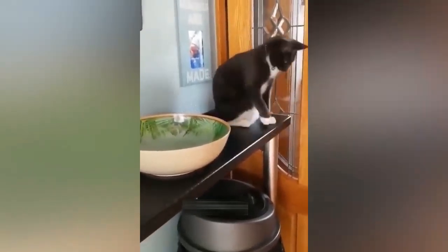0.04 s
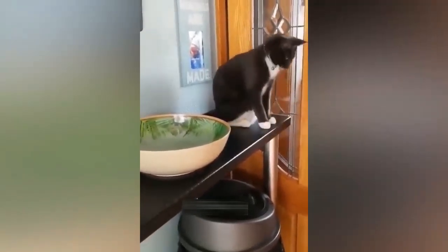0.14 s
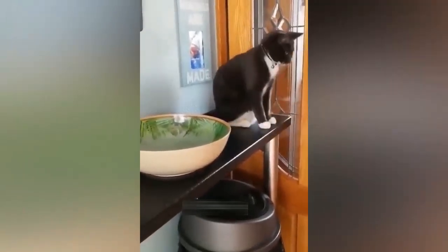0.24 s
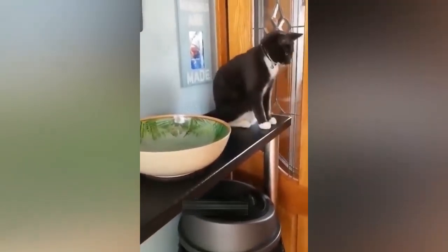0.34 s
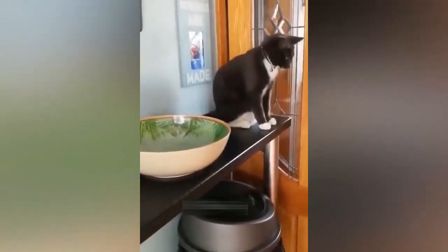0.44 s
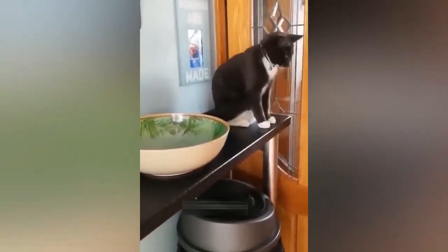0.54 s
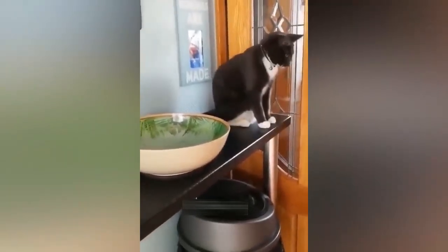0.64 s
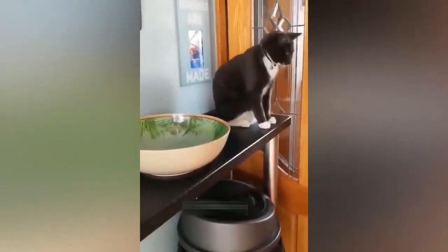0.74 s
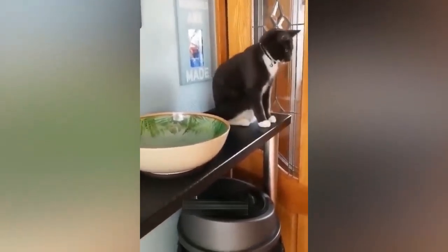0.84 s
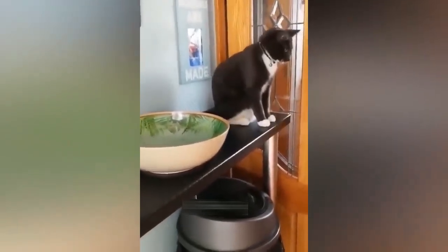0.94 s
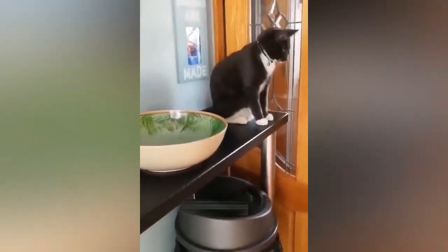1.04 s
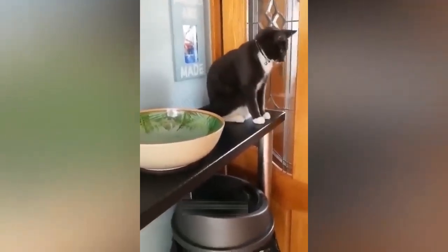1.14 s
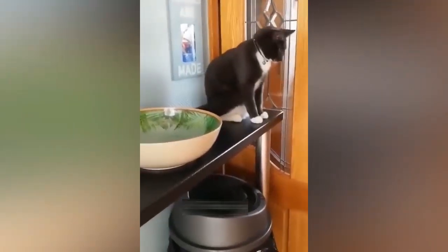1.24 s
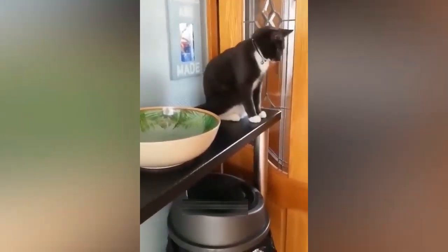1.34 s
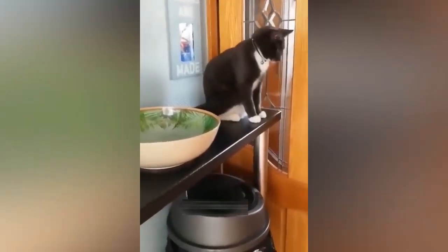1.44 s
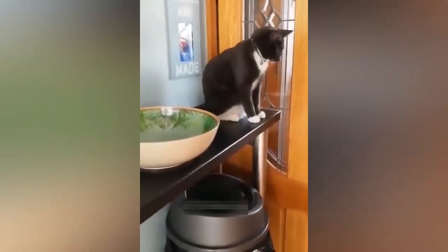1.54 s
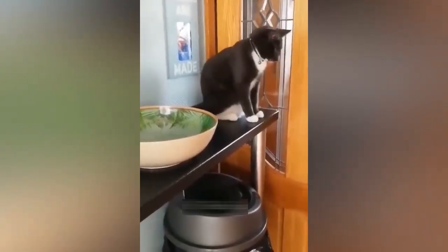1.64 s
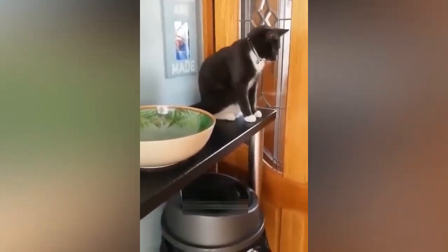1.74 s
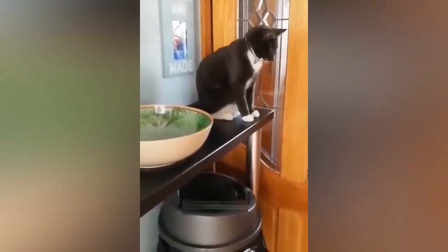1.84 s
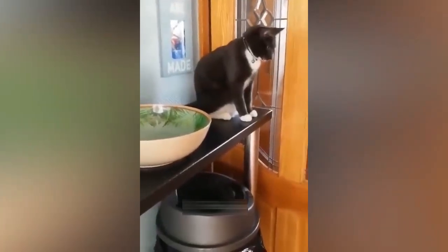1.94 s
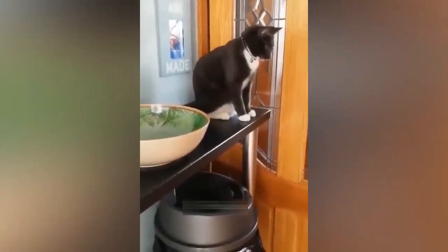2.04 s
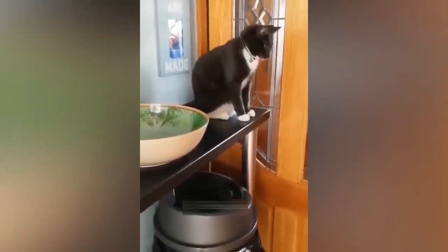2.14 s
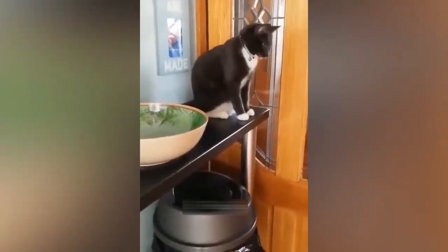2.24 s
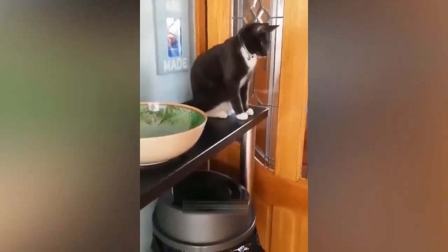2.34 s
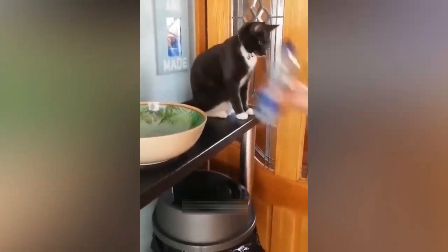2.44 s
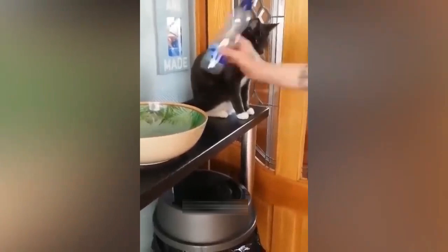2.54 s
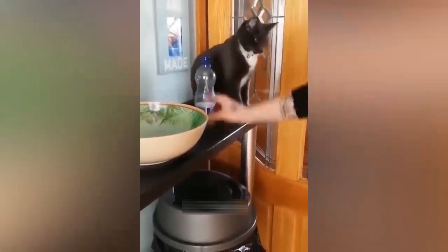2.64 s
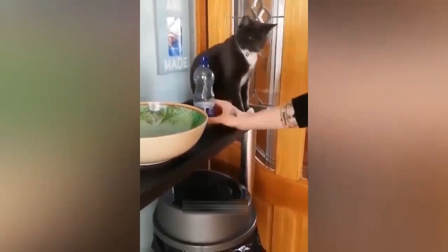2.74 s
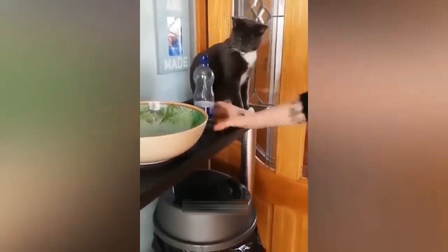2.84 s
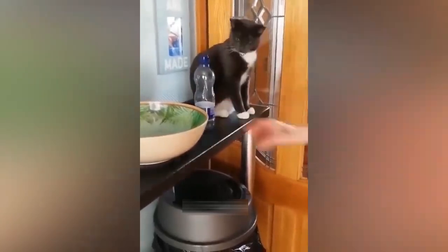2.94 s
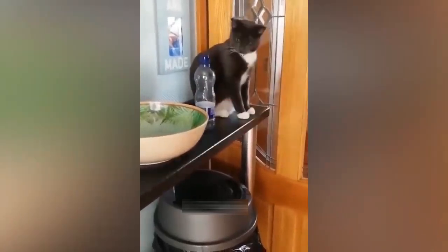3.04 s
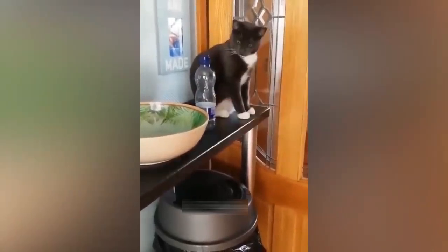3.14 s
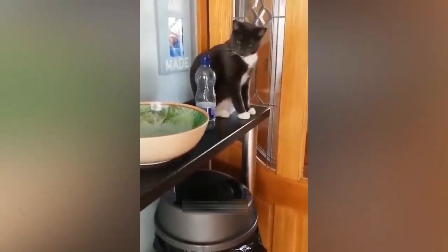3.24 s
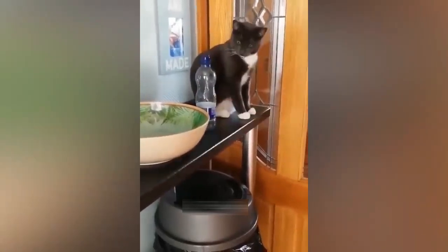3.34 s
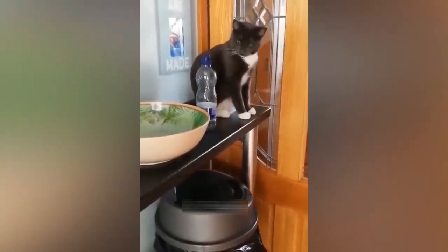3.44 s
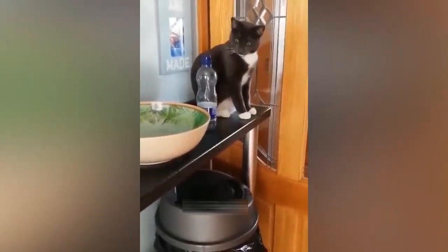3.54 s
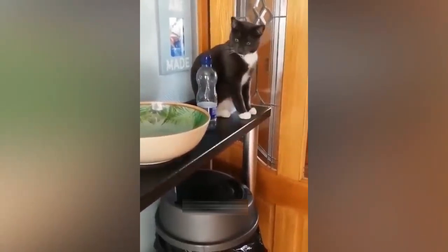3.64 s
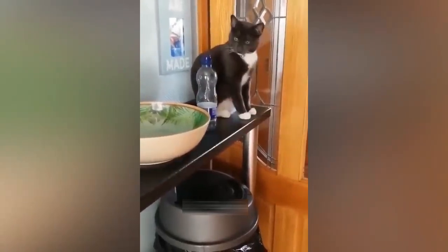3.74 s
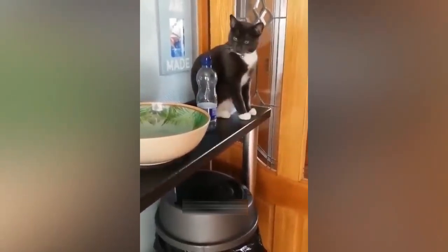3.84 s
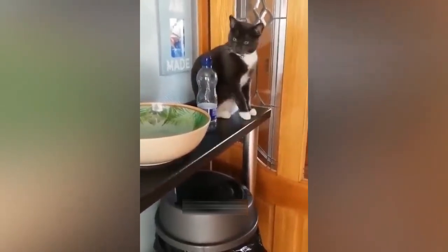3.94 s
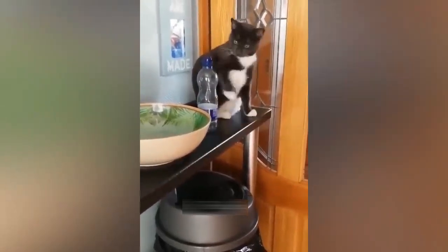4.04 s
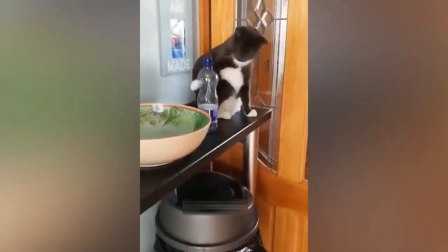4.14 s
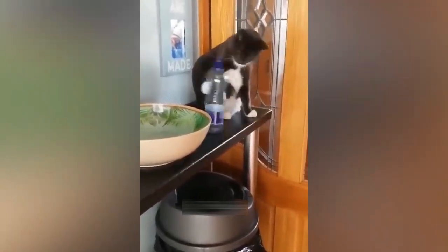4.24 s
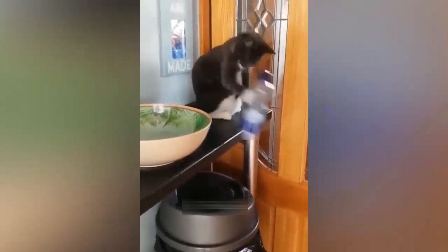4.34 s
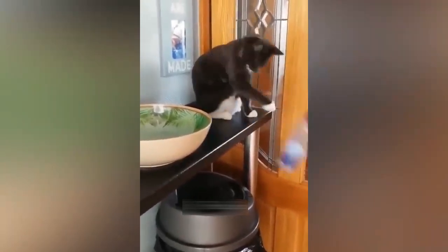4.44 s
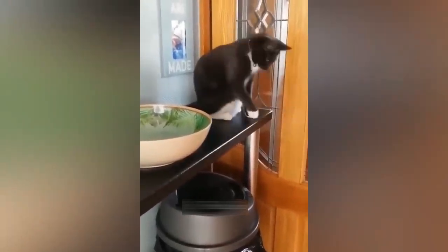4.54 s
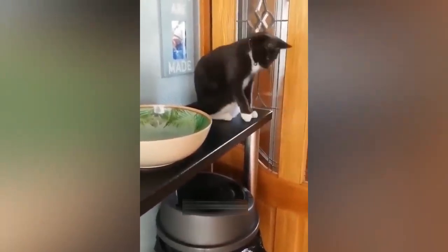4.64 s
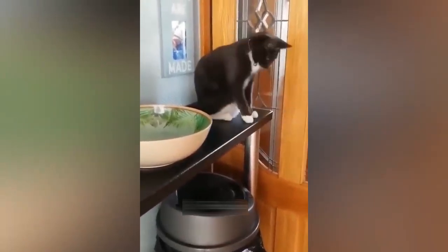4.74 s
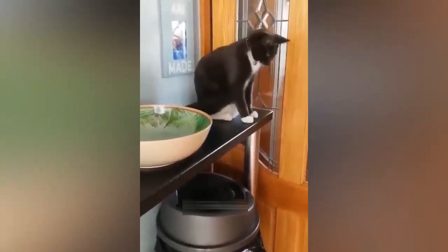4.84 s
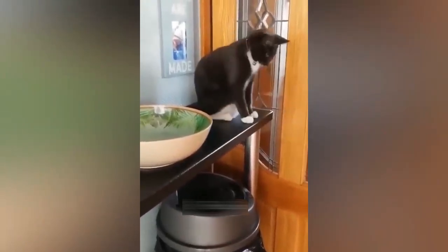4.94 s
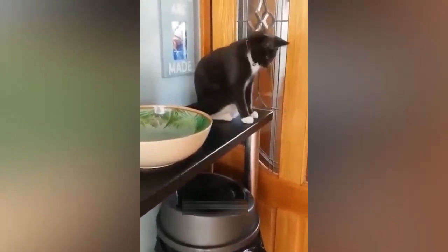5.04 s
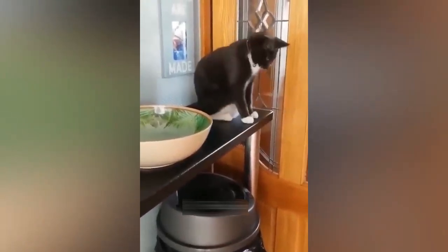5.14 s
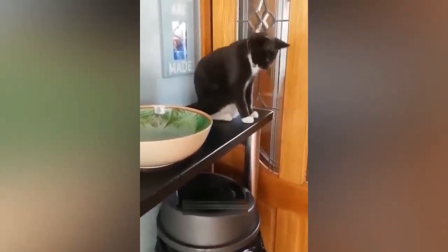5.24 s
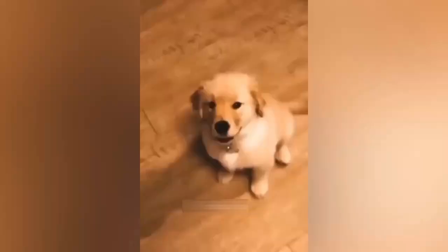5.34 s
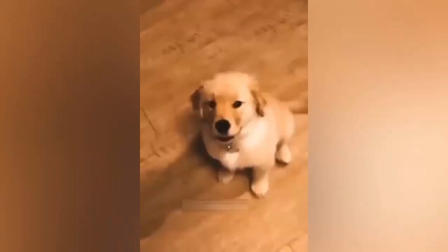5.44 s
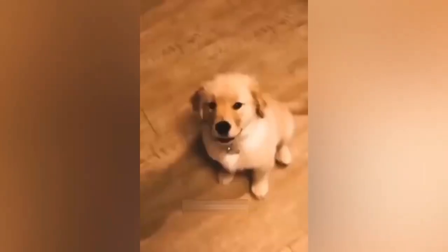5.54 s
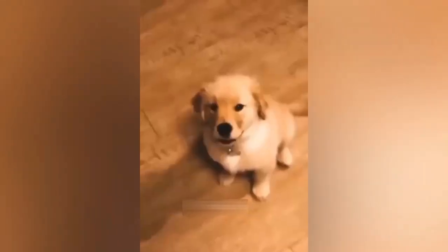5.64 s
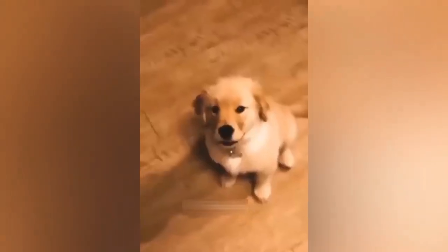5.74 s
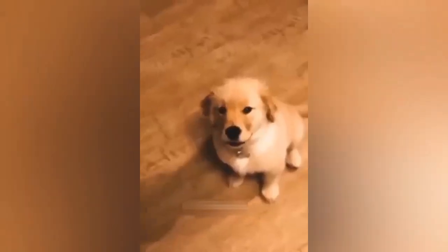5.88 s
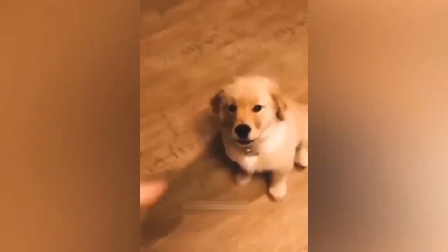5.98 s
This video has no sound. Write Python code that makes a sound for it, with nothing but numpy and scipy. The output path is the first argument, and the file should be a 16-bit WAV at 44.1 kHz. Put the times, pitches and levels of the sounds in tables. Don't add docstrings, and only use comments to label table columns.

```python
import sys
import numpy as np
from scipy import signal
from scipy.io import wavfile
from scipy.ndimage import uniform_filter1d

SR = 44100
rng = np.random.default_rng(int(sys.argv[2]) if len(sys.argv) > 2 else 0)


def dump(signal):
    limited = np.clip(np.atleast_2d(signal).T, -1, 1)
    pcm = np.round(limited * 32767).astype(np.int16)
    wavfile.write(sys.argv[1], SR, pcm)


def gain_from_db(level_db):
    decades = np.asarray(level_db, float) / 20
    return 10 ** decades


N = 265041
T = np.arange(N) / SR
CUT_S, RESUME_S = 5.499, 5.553
EDGES_HZ = 22 * 2 ** np.arange(0, 9.6, 1 / 3)
CENTRES_HZ = np.sqrt(EDGES_HZ[1:] * EDGES_HZ[:-1])
BANK = [signal.butter(2, EDGES_HZ[k:k + 2], "band", fs=SR, output="sos") for k in range(len(CENTRES_HZ))]

# start in seconds, level in dB, frequency in hertz, t60 in seconds,
# push (positive) or pull (negative) as a factor.
CASING_BUMPS = [
    (5.6, -22, 220, 0.016, 1),
    (5.7579, -8, 182, 0.029, -1.34),
    (5.93, -17.5, 6.9, 0.19, 1),
    (5.952, -18, 8.7, 0.24, 0.94),
]
# time in seconds, level in dB.
HAND_UNREST = [(0.0, -50.5), (0.4, -54.5), (0.5, -44.5), (0.8, -42), (1.12, -48.5), (1.3, -39.5),
               (1.64, -50), (2.33, -48.5), (2.7, -60.5), (3.08, -43), (3.8, -59.5), (4.33, -52.5),
               (4.46, -42.5), (4.7, -49), (5.0, -57.5), (5.5, -58)]


def edge_hit():
    # time in seconds, peak in dB, brightness in dB per octave, echo in dB.
    edge_blows = [
        (0.2108, -31, -6.5, -17),
        (0.2142, -6, -1, -8),
    ]
    # frequency in hertz, level per hertz in dB.
    edge_colour = [(71, -46), (120, -12), (586, -15.5), (662, -22), (812, -6.5), (975, -18), (1220, -19),
                   (1870, -7.5), (6460, -12.5), (10300, -9.5), (15500, -19)]
    # frequency in hertz, level in dB, t60 in seconds.
    edge_modes = [(204, 3.5, 0.067), (524, -7, 0.13), (615, -8, 0.29), (800, -9, 0.45), (1220, -5.5, 0.37),
                  (1870, -2, 0.18), (2170, -2, 0.14), (2670, -6, 0.2), (3690, 7.5, 0.052), (3980, 6, 0.041)]
    return knocks(edge_blows, edge_colour, edge_modes,
                  ring_db=-15.0, crack_db=-6.0, crack_tilt_db=0.1, crack_s=0.0033)


def first_bounces():
    # time in seconds, peak in dB, brightness in dB per octave, echo in dB.
    first_blows = [
        (0.528, -4.5, 0.3, -7.5),
        (0.767, -42, 0.3, -1.5),
    ]
    # frequency in hertz, level per hertz in dB.
    first_colour = [(240, -55), (400, -25.5), (1080, -13), (1190, -18), (1540, -10), (1690, -9),
                    (4160, -22.5), (4840, -24), (5390, -20), (11400, -24), (15500, -29)]
    # frequency in hertz, level in dB, t60 in seconds.
    first_modes = [(717, -3, 0.38), (780, -11, 0.4), (1192, 5.5, 0.34), (1376, 4, 0.29), (1634, 3, 0.2),
                   (1725, 1, 0.3), (2004, 5.5, 0.11), (2150, -4, 0.21), (2250, -14, 0.22),
                   (2540, -7, 0.081), (2940, 0.5, 0.11), (3100, 0, 0.17), (3370, -4.5, 0.14),
                   (4020, -14, 0.15)]
    return knocks(first_blows, first_colour, first_modes,
                  ring_db=-17.5, crack_db=-12.0, crack_tilt_db=10.0, crack_s=0.0032)


def set_down():
    # time in seconds, peak in dB, brightness in dB per octave, echo in dB.
    set_blows = [
        (2.804, -1.6, 0.25, -13.5),
        (2.839, -16.5, -1, -13),
    ]
    # frequency in hertz, level per hertz in dB.
    set_colour = [(71, -52), (120, -25), (353, 1), (407, -13.5), (509, -6.5), (552, -9.5), (5380, -15),
                  (6870, -21), (10300, -19), (14000, -31), (15500, -84)]
    # frequency in hertz, level in dB, t60 in seconds.
    set_modes = [(144, -16, 0.099), (274, -1, 0.16), (330, -10, 0.32), (513, 0.5, 0.28), (598, -3, 0.3),
                 (982, -10, 0.25), (1086, -9, .25), (1320, -1, 0.16), (1590, -9, 0.2), (1740, -7, .22),
                 (1776, -2.5, 0.24), (1920, 7.5, 0.07), (2180, -15, .2), (2471, -5, 0.16)]
    return knocks(set_blows, set_colour, set_modes,
                  ring_db=-19.5, crack_db=0.0, crack_tilt_db=-2.5, crack_s=0.0031)


def let_go():
    # time in seconds, peak in dB, brightness in dB per octave, echo in dB.
    release_blows = [
        (2.953, -8.5, -0.1, -12),
        (2.9595, -8, 8, -27),
    ]
    # frequency in hertz, level per hertz in dB.
    release_colour = [(500, -54), (1200, -16), (3300, -12), (4300, -12), (5200, -5.5), (7000, -1.5),
                      (9300, -4), (12500, -1), (16000, -1)]
    # frequency in hertz, level in dB, t60 in seconds.
    release_modes = [(4300, -12, 0.13), (9254, -2, 0.13), (10200, -4, .18), (11600, -8, .2),
                     (12260, 4, .15), (13200, 0, .08), (14140, 0, .14), (15600, -10, .2)]
    return knocks(release_blows, release_colour, release_modes,
                  ring_db=-22.0, crack_db=-3.5, crack_tilt_db=-4.0, crack_s=0.0023)


def second_bounce():
    # time in seconds, peak in dB, brightness in dB per octave, echo in dB.
    second_blows = [
        (4.869, -2, 0.32, -7.5),
    ]
    # frequency in hertz, level per hertz in dB.
    second_colour = [(180, -59), (300, -25.5), (600, -18.5), (674, -12.5), (1020, -13.5), (1780, -7),
                     (2170, -9.5), (8420, -16.5), (9450, -37), (10100, -19), (15500, -20)]
    # frequency in hertz, level in dB, t60 in seconds.
    second_modes = [(686, -1, 0.5), (871, -1.5, 0.6), (1298, 5, .12), (1365, -1, 0.47), (1545, -5, 0.18),
                    (1770, 8.5, 0.21), (1990, 5, 0.097), (2300, -18, 0.2), (2440, -4, 0.1),
                    (2590, -12, 0.3), (2955, -2, 0.46), (3050, -2, 0.31)]
    return knocks(second_blows, second_colour, second_modes,
                  ring_db=-20.0, crack_db=-1.0, crack_tilt_db=-2.5, crack_s=0.0019)


def side_bounce():
    # time in seconds, peak in dB, brightness in dB per octave, echo in dB.
    side_blows = [
        (5.032, -6.5, 0.3, -14),
    ]
    # frequency in hertz, level per hertz in dB.
    side_colour = [(180, -53), (300, -24), (553, -11), (863, 0.5), (1020, -13), (1420, -4), (1540, -8.5),
                   (4960, -21.5), (10400, -18), (15500, -23)]
    # frequency in hertz, level in dB, t60 in seconds.
    side_modes = [(683, -1.5, 0.5), (750, -10.5, 0.6), (877, 0.5, 0.58), (1220, -14, 0.28),
                  (1430, 1.5, 0.35), (1560, -1, 0.089), (1628, -10, 0.37), (1760, -6, 0.38),
                  (1920, -4, 0.16), (1980, -5, 0.23)]
    return knocks(side_blows, side_colour, side_modes,
                  ring_db=-17.5, crack_db=-4.0, crack_tilt_db=0.5, crack_s=0.0013)


def last_bounces():
    # time in seconds, peak in dB, brightness in dB per octave, echo in dB.
    last_blows = [
        (5.272, -13.5, 0.3, -11),
        (5.384, -41, 0.3, -23),
    ]
    # frequency in hertz, level per hertz in dB.
    last_colour = [(180, -62), (300, -68), (685, 1.5), (953, -16), (1750, -9.5), (5390, -9.5), (8140, -30),
                   (10600, -18), (13800, -25), (15500, -53)]
    # frequency in hertz, level in dB, t60 in seconds.
    last_modes = [(694, 2.5, 0.39), (790, 1.5, 0.28), (1200, -1, 0.22), (1550, -4, .25), (1810, 6, 0.21),
                  (1949, 3, 0.22), (2191, -4, .25), (2730, -12, 0.25), (2960, 2, 0.21), (3289, 2, 0.13)]
    return knocks(last_blows, last_colour, last_modes,
                  ring_db=-20.5, crack_db=-5.0, crack_tilt_db=6.0, crack_s=0.0038)


def light_touches():
    # time in seconds, peak in dB, brightness in dB per octave, echo in dB.
    snap_blows = [
        (5.206, -20, -2.4, -9.5),
    ]
    brush_blows = [
        (0.884, -30, -1, -12),
        (0.889, -26, 1, -7),
    ]
    tick_blows = [
        (0.66, -27.5, 1, -4.5),
        (4.288, -42, -6, -14),
        (4.487, -29.5, -7.5, -2),
    ]
    # frequency in hertz, level per hertz in dB.
    snap_colour = [(500, -43), (1200, -12), (3000, -11.5), (4300, -9), (6000, -2), (10000, 0),
                   (14000, -1.5), (16000, -9)]
    # frequency in hertz, level in dB, t60 in seconds.
    brush_modes = [(6900, -4, .1), (10060, 7.5, 0.088)]
    out = knocks(snap_blows, snap_colour, [], ring_db=-20, crack_db=-2.5, crack_tilt_db=-1.0, crack_s=0.0025)
    out += knocks(brush_blows, snap_colour, brush_modes,
                  ring_db=-10.5, crack_db=-7.5, crack_tilt_db=-5.5, crack_s=0.0056)
    out += knocks(tick_blows, snap_colour, [], ring_db=-20, crack_db=-2.5, crack_tilt_db=-1.5, crack_s=0.012)
    return out


def knocks(hits, colour, modes, ring_db, crack_db, crack_tilt_db, crack_s):
    # frequency in hertz, t60 in seconds.
    room_t60 = [(150, 0.17), (400, 0.36), (1040, 0.38), (2760, 0.31), (7280, 0.28)]
    # delay after the blow in seconds, level in dB.
    arrivals = [
        (0.0015, -9),
        (0.0055, -18.5),
        (0.009, -12.5),
    ]
    mic_lag_s = 0.0005
    out, t = np.zeros((2, N)), T[:SR // 3]
    dying = gain_from_db(-120 * t / at_hz(room_t60, CENTRES_HZ)[:, None])
    for s, peak_db, tilt_db, echo_db in hits:
        crack = band_power(colour, tilt_db + crack_tilt_db)[:, None] * np.exp(-t / crack_s) * gain_from_db(crack_db) ** 2
        echo = band_power(colour, tilt_db)[:, None] * gain_from_db(echo_db) ** 2 * (1 - np.exp(-t / 0.012)) * dying
        add(out, gain_from_db(peak_db) * diffuse(crack + echo, wall_noise(len(t)), first=7), s + 0.001)
        front = wavefront(crack[:, 0])
        for late_s, loss_db in arrivals:
            for ear, lag_s in zip(out, rng.permutation([0, mic_lag_s])):
                add(ear, gain_from_db(peak_db + crack_db + loss_db) * front, s + late_s + lag_s)
        for hz, level_db, t60 in modes:
            add(out, mode(t, hz, peak_db + level_db + ring_db, t60), s)
    return out


def wall_noise(length):
    wall = rng.standard_normal(SR // 10) * gain_from_db(-60 * T[:SR // 10] / 0.14)
    wall[0] = 32
    noise = rng.standard_normal((2, 2, length + len(wall) - 1))
    return rms_one(signal.fftconvolve(noise, wall[None, None], "valid"))


def wavefront(power):
    click = np.zeros(SR // 50)
    click[0] = 1
    out = sum(band(click, k) * np.sqrt(power[k] / CENTRES_HZ[k]) for k in range(10, len(power)))
    return out / np.abs(out).max()


def mode(t, hz, level_db, t60):
    twins_db, twin_spread_hz = -7, 30
    ring_rise_s = 0.0042
    mic_phase = rng.uniform(0.5, 0.95) * rng.choice([-1, 1]) * np.array([[1], [-1]]) * min(hz / 600, 1) ** 2
    phase = rng.uniform(0, 2 * np.pi) + mic_phase
    tone = np.sin(2 * np.pi * hz * t + phase)
    for off, start in rng.uniform(-1, 1, (3, 2)) * [0.25, 1] + [[-1, 0], [0.6, 0], [1.5, 0]]:
        twin_hz = hz + twin_spread_hz * off * np.sqrt(hz / 1000)
        tone += gain_from_db(twins_db) * np.sin(2 * np.pi * twin_hz * t + np.pi * start + phase[::-1])
    rise_s = ring_rise_s * min(1000 / hz, (hz / 550) ** 2)
    return gain_from_db(level_db - 60 * t / min(t60, 0.45)) * (1 - np.exp(-t / rise_s)) * tone


def wrapper():
    # start in seconds, peak in dB, frequency in hertz, t60 in seconds.
    film_cracks = [(5.5556, -17.5, 2400, 0.046), (5.558, -10.5, 5000, 0.026), (5.574, -22, 2110, 0.022),
                   (5.5981, -16.5, 3700, 0.031), (5.7562, -4.5, 2730, 0.022), (5.761, -8, 1210, 0.035),
                   (5.767, -11, 1400, .04), (5.7895, -10, 1100, 0.047), (5.7759, -2.5, 4540, 0.035),
                   (5.776, -27, 6800, .02), (5.783, -10.5, 1020, 0.037), (5.796, -22, 900, 0.049),
                   (5.811, -1.5, 5340, 0.014), (5.8138, -7, 3600, 0.025), (5.839, -3, 3850, 0.04),
                   (5.844, -8, 5040, .04), (5.862, -11, 6500, 0.052), (5.8767, -2.5, 4500, 0.0068),
                   (5.8769, -6.5, 1680, 0.049), (5.883, -17, 1700, 0.026), (5.891, -5, 1970, 0.019),
                   (5.892, -10, 3500, 0.011), (5.909, -4.5, 5250, 0.0099), (5.912, -15, 4000, .03),
                   (5.9292, -3.5, 8300, 0.033), (5.9495, -7, 2540, 0.022), (5.951, 3, 5940, 0.019),
                   (5.9532, -6.5, 3500, 0.036), (5.958, 1.5, 8300, 0.016), (5.958, -4.5, 2520, 0.02),
                   (5.965, -23, 3000, 0.061), (6.004, -19, 4500, 0.015), (6.0085, -6.5, 7950, 0.015)]
    # start in seconds, end in seconds, frequency in hertz, level in dB.
    squeak = (5.765, 5.812, 5859, -25.5)
    out, t = rustle(), T[:SR // 5]
    for s, peak_db, hz, t60 in film_cracks:
        burst = rng.standard_normal(len(t)) * (1 - np.exp(-t / 0.00048)) * gain_from_db(-60 * t / t60)
        pitched = ring(burst, hz, 7.7 / hz)
        burst = np.diff(burst, prepend=0)
        crack = burst / np.abs(burst).max() * 0.071 + pitched / np.abs(pitched).max() * 0.6
        add(out, gain_from_db(peak_db) * crack, s)
    for s, level_db, hz, t60, push in CASING_BUMPS:
        thump = np.sin(2 * np.pi * hz * t + 1.0) * (1 - np.exp(-t / 0.0008))
        add(out, push * gain_from_db(level_db - 60 * t / t60) * thump, s)
    start, end, hz, level_db = squeak
    fade = np.clip(np.minimum(T - start, end - T) / 0.0019, 0, 1)
    out += gain_from_db(level_db) * fade * np.sin(2 * np.pi * hz * T)
    out = 0.67 * np.tanh(out / 0.8) * np.clip((T - RESUME_S) / 0.001, 0, 1)
    return signal.sosfilt(signal.ellip(8, 0.5, 65, 8900, fs=SR, output="sos"), out)


def rustle():
    # start in seconds, crisp rustle in dB, hold in seconds, t60 in seconds, dull rustle in dB.
    squeezes = [(5.555, -32.5, 0.017, 0.063, -36.5), (5.596, -38, 0.0061, 0.36, -49),
                (5.744, -42, .01, .05, -52), (5.7552, -23, 0.11, 0.088, -24), (5.873, -26, .004, 0.64, -42),
                (5.943, -25, .004, .05, -49), (5.949, -17.5, 0.01, 0.075, -47),
                (5.996, -26, .03, 0.043, -46)]
    # frequency in hertz, level per hertz in dB.
    rustle_colour = [(1400, -1), (1700, 5.5), (2900, 5), (4500, 7.5), (6000, 5), (7300, 3), (8600, 2)]
    rise_s, dull_t60_s, rest_db = 0.0017, 0.28, -50.5
    rumble_below_db, rumble_t60_s, rumble_rest_db = 21.5, 0.67, -62
    gate_shut_s, gate_slip_s, gate_depth_db = (5.667, 5.746), 0.0065, -11
    gate_opens_s = [5.6806, 5.6976, 5.7151, 5.731]
    late = slice(N - SR // 2, N)

    crisp_gain, dull_gain, rumble_gain = gain_from_db(rest_db), gain_from_db(rest_db - 3), gain_from_db(rumble_rest_db)
    for s, crisp_db, held, t60, dull_db in squeezes:
        crisp_gain = crisp_gain + gain_from_db(crisp_db) * swell(s, rise_s, held, t60)[late]
        dull_fall = min(dull_t60_s, t60 + 4 * held)
        dull_gain = dull_gain + gain_from_db(dull_db) * swell(s, rise_s, 0.53 * held, dull_fall)[late]
    for s, bump_db, *_ in CASING_BUMPS:
        rumble_gain = rumble_gain + gain_from_db(bump_db - rumble_below_db) * swell(s, 0.0035, 0, rumble_t60_s)[late]

    grains = (rng.standard_normal(N) * gain_from_db(2.0 * drift(300)))[late]
    crisp = sum(band(grains, k) * gain_from_db(at_hz(rustle_colour, hz))
                for k, hz in enumerate(CENTRES_HZ[:27]) if hz > 1300)
    dull = signal.sosfilt(signal.butter(2, [650, 1500], "band", fs=SR, output="sos"), grains)
    rumble = signal.sosfilt(signal.butter(2, [20, 140], "band", fs=SR, output="sos"), grains[::-1])

    slipped = np.any([(T > s) & (T < s + gate_slip_s) for s in gate_opens_s], axis=0)
    shut = (T > gate_shut_s[0]) & (T < gate_shut_s[1]) & ~slipped
    flutter = gain_from_db(gate_depth_db * uniform_filter1d(shut * 1.0, size=44))[late]
    out = np.zeros(N)
    out[late] = flutter * (crisp_gain * rms_one(crisp) + dull_gain * rms_one(dull) + rumble_gain * rms_one(rumble))
    return out


def add_scuffs(power):
    # time of the top in seconds, rise in seconds, level in dB, centre in hertz, width in octaves.
    scuffs = [(0.7, 0.04, -44, 830, 0.17), (0.85, 0.09, -46.5, 660, 0.21), (1.08, 0.063, -48.5, 720, 0.22),
              (1.07, 0.013, -52, 13000, 0.99), (0.778, .006, -45, 9000, 1.4),
              (1.058, 0.0074, -48, 12000, 0.35), (1.415, 0.032, -39.5, 3600, 0.23),
              (1.57, 0.016, -59, 7700, 0.78), (1.507, 0.074, -38, 3700, 0.34),
              (1.61, 0.01, -44, 14000, 1.06), (1.82, 0.16, -48.5, 510, 0.56), (2.12, 0.06, -57, 9000, 1.1),
              (2.55, .02, -57, 9000, 2.1), (3.35, 0.05, -40.5, 1550, 0.69), (3.36, 0.049, -45, 12400, 0.76),
              (3.79, 0.099, -56.5, 9000, 3.2), (4.05, 0.034, -44, 1280, 0.46),
              (4.44, 0.027, -48, 1300, 1.8), (4.47, 0.031, -48, 3800, 0.33),
              (4.5, 0.018, -36.5, 3900, 0.15), (4.52, 0.051, -44.5, 9500, 0.19),
              (5.36, 0.027, -51, 8400, 0.55), (2.14, 0.17, -53, 1160, 0.16), (2.7, 0.048, -70, 1500, 0.35),
              (4.35, 0.059, -54, 5800, 0.44)]
    grain = gain_from_db(0.7 * drift(80)) ** 2
    for s, rise, level_db, hz, octaves in scuffs:
        near = slice(round((s - 0.2) * SR), round((s + 0.3) * SR))
        t = T[near] - s
        stroke = np.where(t < 0, np.exp(-(t / rise) ** 2 * 2), gain_from_db(-120 * np.abs(t) / 0.28))
        share = np.exp(-0.5 * (np.log2(CENTRES_HZ / hz) / octaves) ** 2)
        power[:, near] += gain_from_db(level_db + 1.5) ** 2 * share[:, None] / share.sum() * stroke * grain[near]


def rolling_power():
    # start in seconds, length in seconds, level in dB.
    rolls = [(0.492, 0.054, -40), (0.63, 0.14, -46), (0.798, 0.75, -50.5), (1.912, 0.038, -60),
             (2.85, 0.11, -66), (3.535, 0.17, -61), (4.427, 0.028, -54), (5.103, 0.089, -42),
             (5.227, 0.16, -38.5)]
    # frequency in hertz, level per hertz in dB.
    roll_colour = [(500, -1.5), (1500, 5.5), (4000, 0), (7000, -1), (10500, 3.5), (13000, -1.5),
                   (15000, -18)]
    rise_s, t60_s, rest_db = 0.04, 0.43, -62
    rolling = gain_from_db(rest_db) + sum(gain_from_db(db) * swell(s - rise_s, rise_s, held, t60_s) for s, held, db in rolls)
    return band_power(roll_colour)[:, None] * (rolling * gain_from_db(3.1 * drift(22) - 1.9)) ** 2


def fingers():
    # start in seconds, peak in dB, frequency in hertz.
    grips = [(0.408, -19, 267), (0.48, -18, 292), (0.509, -16, 291), (0.617, -23, 323), (0.729, -25, 320),
             (0.786, -28, 300), (0.857, -27, 293), (1.054, -27, 257), (1.17, -24, 275), (1.212, -26, 258),
             (1.292, -28, 274), (1.763, -27, 319), (3.055, -37, 314), (3.19, -29.5, 316),
             (4.299, -30.5, 254), (4.418, -27.5, 253), (4.582, -33, 275)]
    slips = (rng.random(N) < 300 / SR) * gain_from_db(2.43 * rng.exponential(1, N)) * rng.choice([-1, 1], N)
    dealt = rng.integers(0, 3, N)
    thuds = sum(ring(slips * (dealt == k), hz, 0.088) for k, hz in enumerate((245, 295, 350)))
    thuds = signal.sosfilt(signal.butter(2, [190, 520], "band", fs=SR, output="sos"), thuds)
    out = gain_from_db(in_time(HAND_UNREST)[0] - 3.0) * rms_one(thuds)
    t = T[:SR // 10]
    for s, peak_db, hz in grips:
        pulse = t / 0.0072 * np.exp(1 - t / 0.0057)
        add(out, gain_from_db(peak_db - 6.5) * pulse * np.sin(2 * np.pi * hz * t), s)
    return out


def whistles():
    # frequency in hertz, width in hertz, level in dB.
    air_lines = [(1096, 70, -62), (1201, 62, -64), (1423, 7.3, -65.5)]
    # start in seconds, frequency in hertz, width in hertz,
    # level in dB, t60 in seconds.
    slide = (4.478, 1221, 120, -37.5, 0.3)
    out, noise = 0, rng.standard_normal((2, N))
    for hz, width_hz, level_db in air_lines:
        out = out + gain_from_db(level_db) * rms_one(ring(noise, hz, 2.3 / width_hz)) * (T < CUT_S)
    s, hz, width_hz, level_db, t60 = slide
    t = np.clip(T - s, 0, None)
    sing = (1 - np.exp(-t / 0.0031)) * gain_from_db(-60 * np.clip(t - 0.03, 0, None) / t60)
    return out + gain_from_db(level_db) * sing * rms_one(ring(noise[::-1], hz, 4.3 / width_hz))


def air_power():
    # frequency in hertz, level per hertz in dB.
    air_colour = [(11, -55), (18, -19), (38, -19.5), (70, -11.5), (95, -3.5), (159, -16.5), (236, -3.5),
                  (322, -5), (452, -5), (492, -7), (536, -11.5), (1150, -11), (2080, -19.5), (10400, -31.5),
                  (15500, -32)]
    mean_db, follows, lag_s = -48, 0.28, 0.11
    arm_db = uniform_filter1d(in_time(HAND_UNREST)[0], round(lag_s * SR))
    level_db = mean_db + follows * (arm_db - arm_db.mean()) + 1.5 * drift(6)
    return band_power(air_colour)[:, None] * gain_from_db(level_db) ** 2


def room_noise():
    power = air_power() + rolling_power()
    add_scuffs(power)
    return diffuse(power, rng.standard_normal((2, 2, N)))


def diffuse(power, white, first=0):
    likeness = [(100, 1), (290, 0.96), (640, -0.41), (1400, -0.0049), (6800, 0.061), (8800, -0.11),
                (10300, 0.99), (12200, 0.49), (15000, 0.47)]
    out = 0
    for k in range(first, len(CENTRES_HZ)):
        mid, side = band(white[k % 2], k) * np.sqrt(SR / 2 / (EDGES_HZ[k + 1] - EDGES_HZ[k]))
        alike = np.clip(at_hz(likeness, CENTRES_HZ[k]), -1, 1)
        pair = np.sqrt(1 + alike) * mid + np.sqrt(1 - alike) * side * [[1], [-1]]
        out = out + np.sqrt(power[k] / 2) * pair
    return out


def band_power(colour, tilt_db=0.0):
    power = gain_from_db(at_hz(colour, CENTRES_HZ) + tilt_db * np.log2(CENTRES_HZ / 2000)) ** 2 * CENTRES_HZ
    return power / power.sum()


def band(x, k):
    return signal.sosfilt(BANK[k], x)


def ring(clicks, hz, t60):
    r, w = gain_from_db(-60 / (t60 * SR)), 2 * np.pi * hz / SR
    return signal.lfilter([0, np.sin(w)], [1, -2 * r * np.cos(w), r * r], clicks + 1e-18)


def swell(start, rise, held, t60):
    t = T - start
    return np.clip(t / rise, 0, 1) * gain_from_db(-60 * np.clip(t - rise - held, 0, None) / t60)


def drift(rate):
    knots = np.arange(-1, N / SR * rate * 2 + 1) / (rate * 2)
    return np.interp(T, knots, rng.standard_normal(len(knots))) * 1.22


def at_hz(points, hz):
    return np.interp(np.log(hz), np.log(np.array(points)[:, 0]), np.array(points)[:, 1])


def in_time(rows):
    s, *columns = np.transpose(rows)
    return [np.interp(T, s, c) for c in columns]


def rms_one(x):
    return x / np.sqrt(np.mean(x ** 2) + 1e-20)


def add(out, x, s):
    at = round(s * SR)
    out[..., at:at + x.shape[-1]] += x[..., :N - at]


def treble_dropouts(x):
    holes_from_hz, hole_share, ceiling_hz = 4300, 0.3, 15800
    hz, _, z = signal.stft(x, SR, nperseg=1024)
    energy = np.abs(z) ** 2
    level_db = 10 * np.log10(np.mean(energy, axis=(0, 1)) + 1e-14)
    busy = np.clip((level_db - np.median(level_db)) / 12, 0.25, 1)
    busy[np.gradient(level_db) > 2] = 0
    cells = rng.random((len(hz) // 8 + 1, len(busy) // 5 + 1))
    cells = cells.repeat(8, 0).repeat(5, 1)[:len(hz), :len(busy)]
    dropped = (cells < hole_share * busy) & (hz[:, None] > holes_from_hz)
    treble_share = np.mean(energy[:, hz > 11000], axis=(0, 1)) / 10 ** (level_db / 10)
    dull = 1 - np.clip(treble_share, 0, 1) ** 2
    dropped |= hz[:, None] > ceiling_hz + 500 * (busy == 0) - 1900 * cells[0] * np.sqrt(busy) * dull
    return signal.istft(z * np.where(dropped, 0.02, 1), SR, nperseg=1024)[1][:, :N]


def scene():
    room = edge_hit() + first_bounces() + set_down() + let_go()
    room += second_bounce() + side_bounce() + last_bounces() + light_touches()
    room += fingers() + whistles() + room_noise()
    room = treble_dropouts(0.92 * np.tanh(room / 0.92))
    return room * np.clip((CUT_S - T) / 0.00066, 0, 1) + wrapper()


def band_limit(x):
    return signal.sosfilt(signal.butter(12, 16470, fs=SR, output="sos"), x)


def record(dry):
    mix = signal.sosfilt(signal.cheby2(10, 50, 16500, fs=SR, output="sos"), dry)
    return band_limit(mix)


dry = scene()
out = record(dry)
dump(out)
```